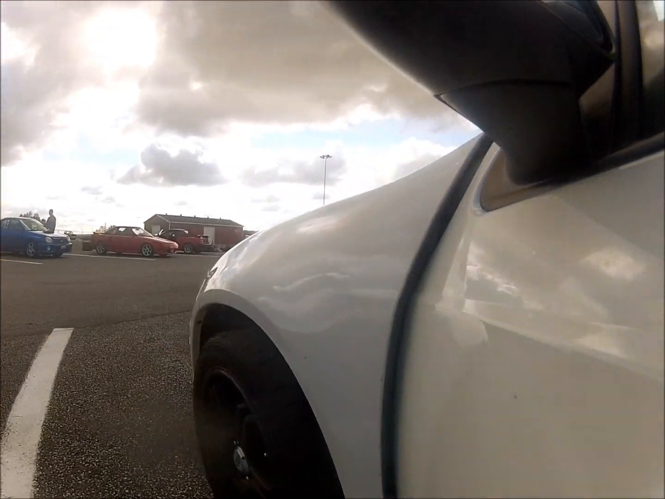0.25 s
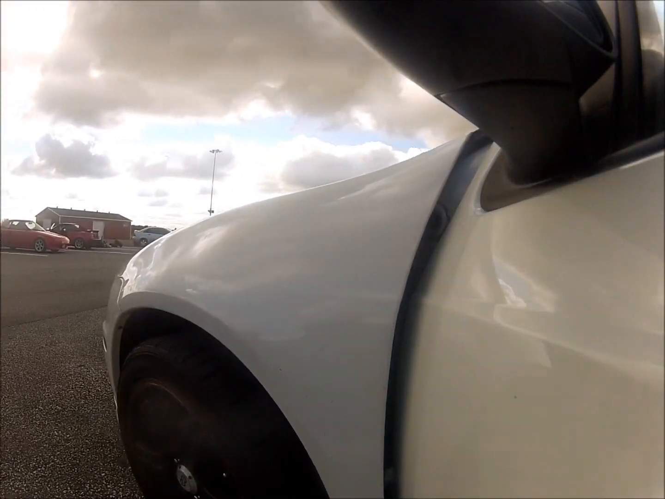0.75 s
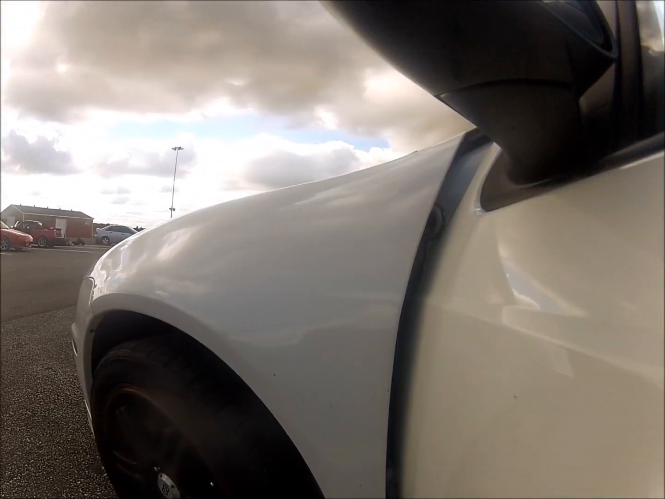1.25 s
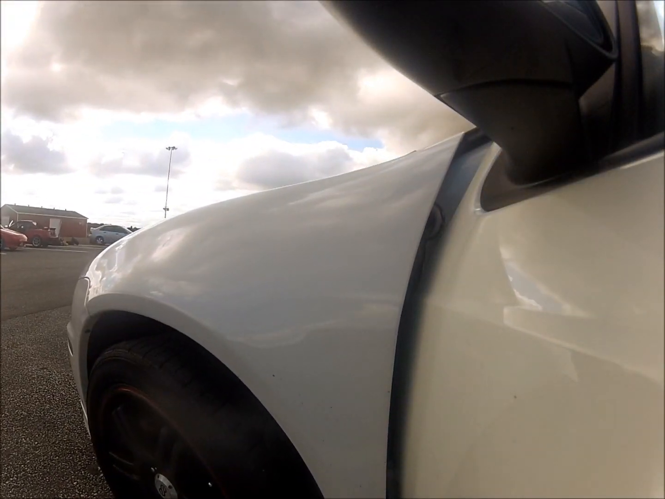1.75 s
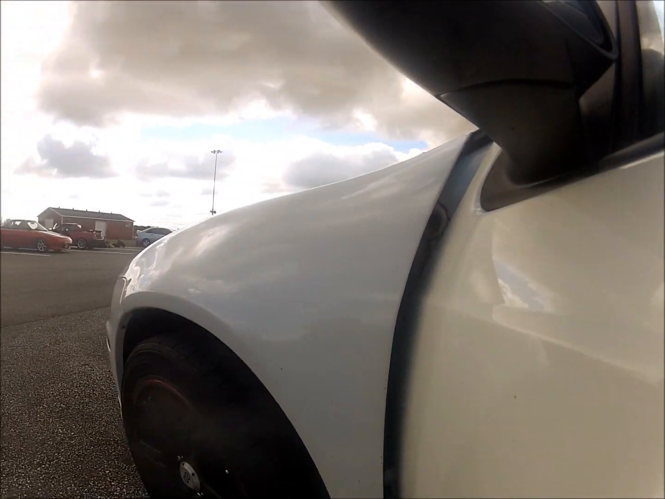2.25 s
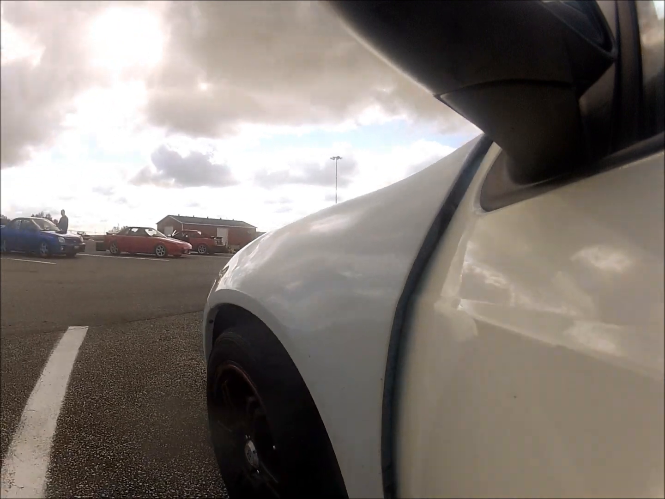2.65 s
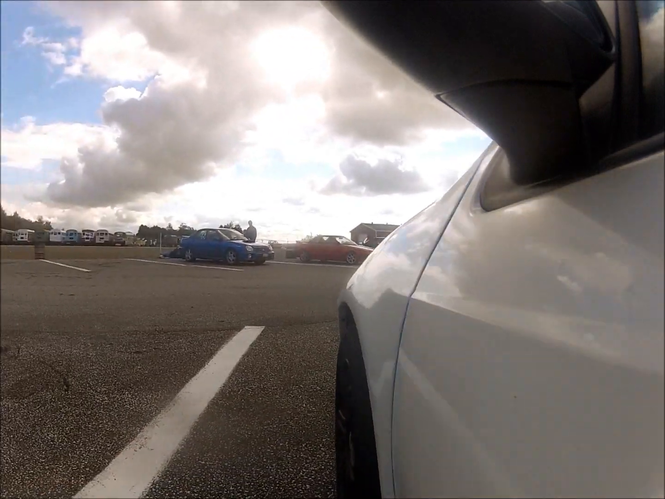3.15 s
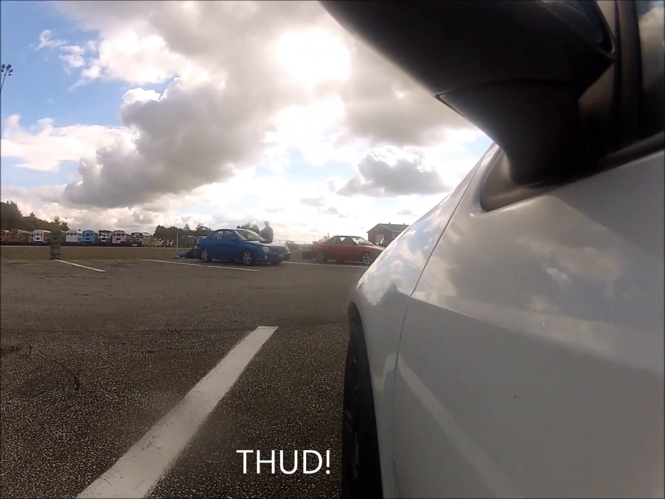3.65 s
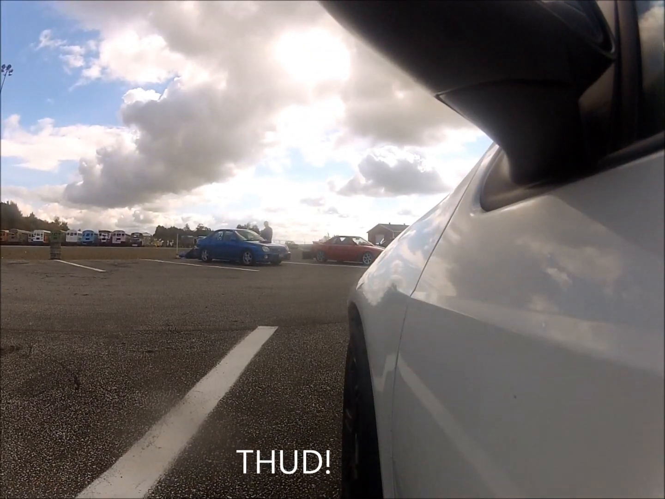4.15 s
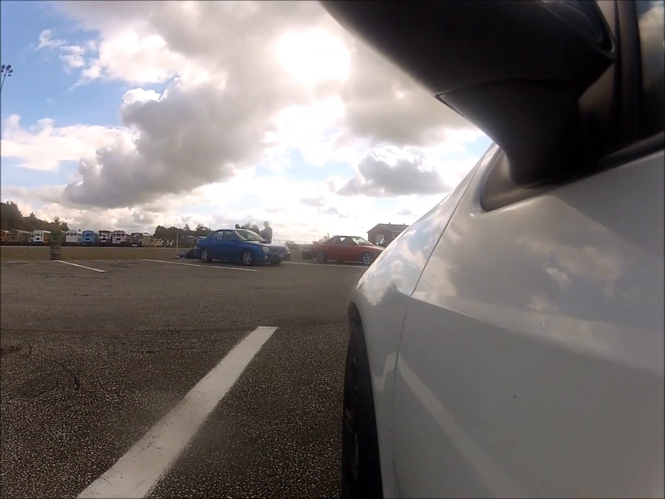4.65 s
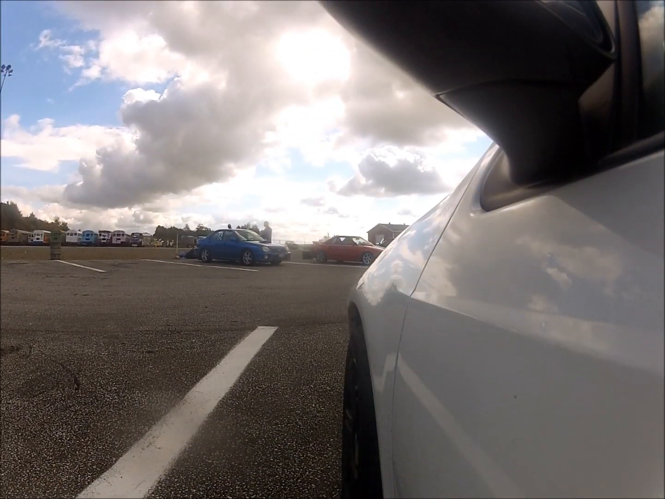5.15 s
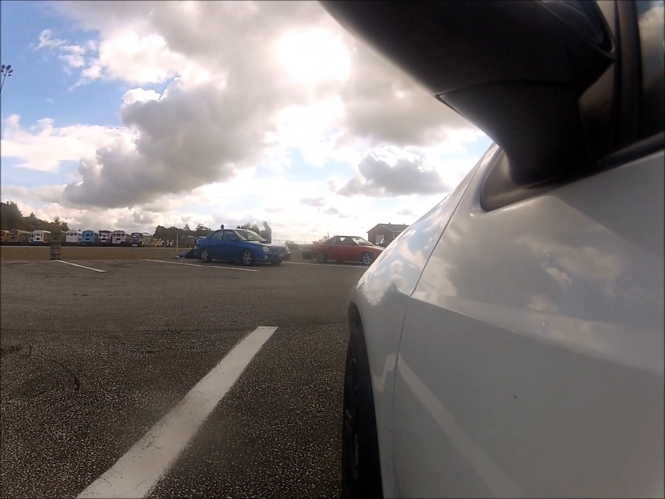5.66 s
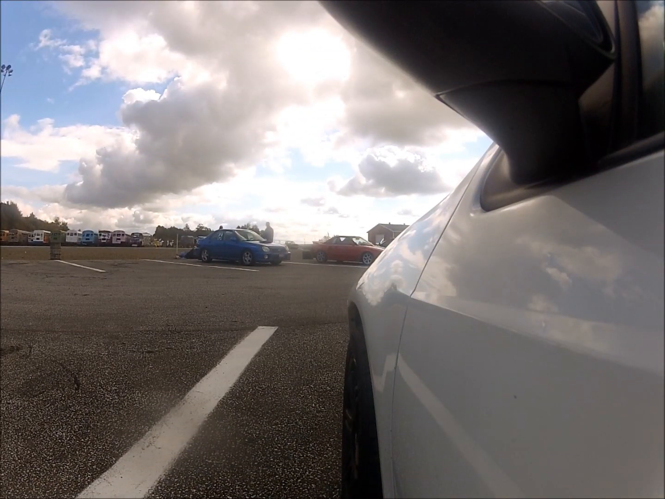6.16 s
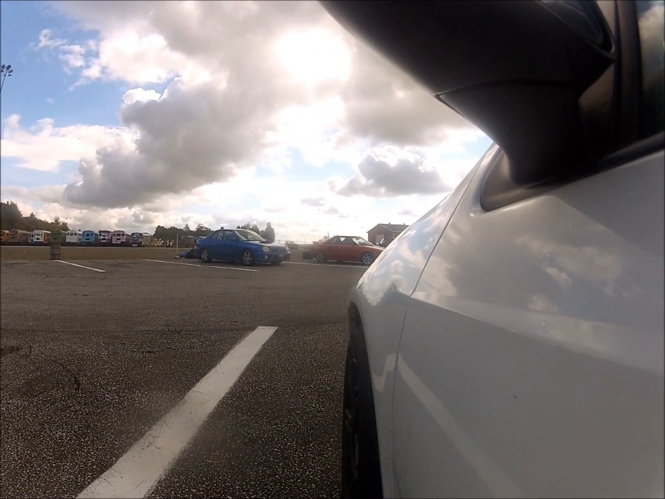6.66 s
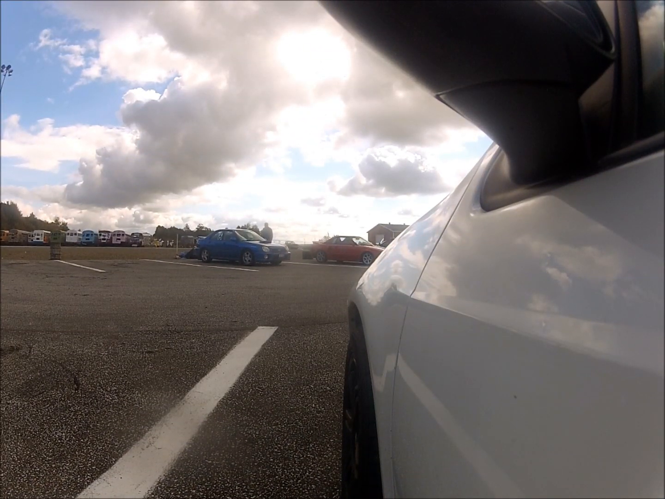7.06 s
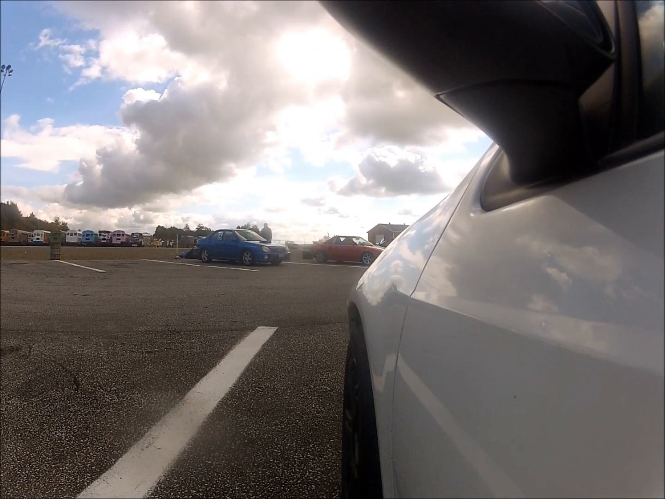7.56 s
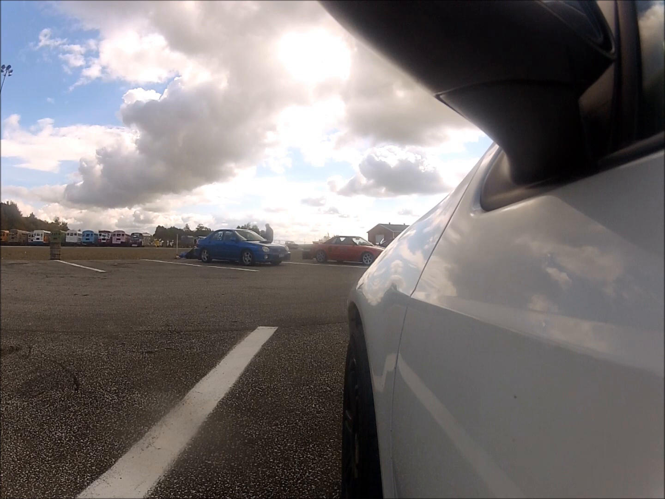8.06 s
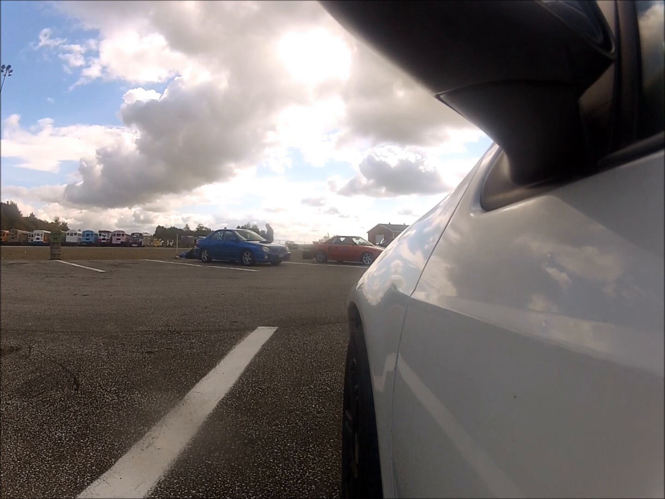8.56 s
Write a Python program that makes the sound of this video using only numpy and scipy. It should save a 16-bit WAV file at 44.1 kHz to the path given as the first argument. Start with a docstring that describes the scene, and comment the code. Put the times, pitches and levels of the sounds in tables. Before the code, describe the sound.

Quiet outdoor hiss, heard close against car bodywork. Four firm metallic knocks come as the door opens, then soft cloth rustles and a few dull bumps. A second cluster of knocks leads into one heavy, boomy slam with a short bright buzz. Inside, small hard taps and soft thuds carry through the metal. A very faint steady whine joins, and finally a gritty starter grinds and groans, without the engine catching.

```python
"""Car door, slam and starter

A camera stuck to the outside of a car door in an open paddock hears mostly through the metal, over a soft hiss.
The door knocks over its check strap as it opens and swings back, then slams and buzzes: rung metal and noise.
The driver taps, bumps and rustles inside, and each blow leaves the car body rumbling and the camera rocking.
A pump whines as a wavering tone; then the starter bites and cranks: gear noise, whining tones and a motor groan."""
import sys
import numpy as np
from scipy import signal
from scipy.fft import rfft, irfft, next_fast_len
from scipy.io import wavfile
from scipy.ndimage import uniform_filter1d

SR = 44100
rng = np.random.default_rng(int(sys.argv[2]) if len(sys.argv) > 2 else 0)


def log_audio(samples):
    """Write samples as a 16-bit WAV file to the path given in sys.argv[1]."""
    # one column per channel
    frames = np.atleast_2d(samples).T
    # limit to full scale, then quantise
    limited = np.clip(frames, -1, 1)
    pcm = np.round(limited * 32767).astype(np.int16)
    wavfile.write(sys.argv[1], SR, pcm)


N = 388521
T = np.arange(N) / SR  # time of every sample [s]

# The four tables of blows share these columns:
# (time [s], strength [dB], boom against strength [dB], ring against strength [dB])
# the door knocks over the notches of its strap, and settles in its latch
STRAP_KNOCKS = [(0.217, -41, -4, -11.5), (0.262, -37, -13, -14), (0.484, -42, -6.5, -14),
                (0.552, -39.5, -8, -19.5), (2.373, -38, -5, -14), (2.423, -32, -9, -18),
                (2.62, -35.5, -4.5, -7.5), (2.651, -30.5, -15, -18), (2.667, -35, -12, -15.5),
                (2.722, -51.5, -12, -10), (3.403, -35.5, 6, -16.5), (3.452, -46, 0, -13)]
# soft blows of limbs, seat and pedals
SOFT_BUMPS = [(1.48, -57, 14.5, -31), (1.642, -53.5, -8, -10.5), (2.15, -51.5, -5, -21),
              (2.298, -65, 23.5, -10), (3.68, -45, -1.5, -22.5), (3.75, -42.5, -6, -30),
              (3.79, -46.5, -3, -19), (5.568, -44.5, -17, -22), (6.307, -50.5, 1, -23),
              (6.387, -34.5, -1.5, -19.5), (6.718, -44, 4.5, -17.5), (6.996, -47, 6.5, -31),
              (7.145, -40.5, -2, -18), (7.172, -39, -0.5, -45), (7.29, -36.5, 3.5, -29),
              (7.342, -52, 19, -25), (7.646, -39.5, 2.5, -17), (7.739, -29, -2, -19.5)]
# the door meets seal, latch and frame
DOOR_SLAM = [(3.123, -42, 2.5, -26), (3.158, -47.5, 5, -2), (3.202, -23, -4, 5), (3.24, -11.5, -7, -18.5)]
# hard things handled in the cabin
HARD_TAPS = [(4.46, -64, 4, -1), (4.511, -61.5, 2, -5), (4.607, -53, 5.5, -3), (4.696, -54, 4, -6),
             (4.862, -49, 0.5, -7), (5.013, -65.5, 2, -1.5), (5.055, -53, 0, -7), (5.084, -51, 6.5, -25),
             (5.258, -54, 3, -10), (5.32, -43.5, -6, -3.5), (5.402, -44, -1.5, -11.5), (5.46, -59, -10, -8),
             (5.873, -49, -5.5, -7.5), (6.686, -53, -14, -9.5), (6.868, -50.5, -6, -17),
             (7.983, -67, 1, 2.5), (8.168, -62, 1, -6)]
# the car heaves under the driver's weight, the rebounding door and the first compressions:
# (time of the top [s], half-length [s], rocking [dB], rumble [dB])
CAR_HEAVES = [(1.767, 0.13, -46.5, -45.5), (3.051, 0.1, -45, -43), (3.443, 0.12, -22, -46.5),
              (4.75, 0.097, -50, -55), (6.437, .06, -44, -54), (6.797, 0.23, -55, -51),
              (7.18, .12, -54, -49.5), (7.84, .045, -39.5, -46), (8.52, 0.058, -20, -47),
              (8.751, 0.055, -34, -45.5)]
SHAKE_RISE_S, SHAKE_T60_S = 0.03, 1.1  # the body takes up a blow and lets it die away by 60 dB


def amp(db):
    """Turn decibels into a gain."""
    return 10 ** (np.asarray(db) / 20)


def unit(x):
    """Scale a sound to an average (rms) level of 1."""
    return x / np.sqrt(np.mean(x ** 2) + 1e-20)


def curves(rows):
    """Draw each column of a time table as a line through its points, sample by sample."""
    times, *columns = np.transpose(rows)
    return [np.interp(T, times, column) for column in columns]


def band(x, lo_hz, hi_hz, order=3):
    """Let through only the pitches between two limits."""
    limits = [lo_hz, min(hi_hz, SR / 2 - 1)]
    return signal.sosfilt(signal.butter(order, limits, "band", fs=SR, output="sos"), x)


def gain_at(hz, points):
    """Read a (frequency [Hz], level [dB]) table as a gain at any pitch."""
    at, db = np.transpose(points)
    return amp(np.interp(np.log(hz), np.log(at), db))


def colour(x, points):
    """Shape a sound's mix of pitches by a table, then scale it to rms 1."""
    n = next_fast_len(len(x))
    hz = np.arange(n // 2 + 1) * SR / n + 1
    return unit(irfft(rfft(x, n) * gain_at(hz, points), n)[:len(x)])


def noise(points, n=N):
    """Make noise with the given mix of pitches, at rms 1."""
    return colour(rng.standard_normal(n), points)


def walk(rate):
    """Wander slowly at random, with a spread near 1; rate is in steps per second."""
    k = int(SR / rate)
    steps = np.repeat(rng.standard_normal(N // k + 1), k)[:N]
    return unit(uniform_filter1d(steps, k))


def fade(t, t60):
    """Die away smoothly, falling 60 dB in t60 seconds."""
    return np.exp(-np.log(1000) * t / t60)


def gate(start, end, edge):
    """Open from start to end with straight ramps of edge seconds."""
    return np.clip(np.minimum(T - start, end - T) / edge, 0, 1)


def add(out, s, x):
    """Mix x into out at time s."""
    i = int(s * SR)
    out[i:i + len(x)] += x[:len(out) - i]


def air(flicker_db=.9, sing_hz=2320, sing_width_hz=170, sing_db=-83, sing_end=4.5):
    """Smooth hiss of the open paddock, with a faint narrow band of noise in it until sing_end."""
    # mix of pitches in the hiss: (frequency [Hz], level [dB])
    hiss_colour = [(150, -10), (300, -3.5), (480, -10.5), (850, -11.5), (2200, -16), (4000, -20),
                   (5100, -20), (7000, -23), (10000, -31), (15000, -39.5)]
    # slow course of the hiss: (time [s], level [dB])
    hiss_level = [(0, -76), (1.3, -74), (3, -70.5), (6, -67.5)]
    hiss = amp(curves(hiss_level)[0] + flicker_db * walk(10)) * noise(hiss_colour)
    lo, hi = sing_hz - sing_width_hz / 2, sing_hz + sing_width_hz / 2
    sing = unit(band(rng.standard_normal(N), lo, hi, order=1))
    return hiss + amp(sing_db) * (T < sing_end) * sing


def shake(rows, db, t60):
    """Power that the boom of each blow leaves in the car body: a quick rise and a slow fade."""
    out, t = np.zeros(N), np.arange(2 * SR) / SR
    shape = (1 - np.exp(-t / SHAKE_RISE_S)) * fade(t, t60)
    for s, strength, boom, _ in rows:
        add(out, s, (amp(strength + boom + db) * shape) ** 2)
    return out


def heave(s, width):
    """Power of one smooth swell, 1 at its top."""
    return np.exp(-2 * ((T - s) / width) ** 2)


def fidget(empty_db, seated_db, seated=4.28, settle=.3):
    """Power of the restless background, higher once the driver sits inside (times in s)."""
    return amp(np.interp(T, [seated, seated + settle], [empty_db, seated_db])) ** 2


def body(panel_db=-9, panel_empty_db=-70, panel_seated_db=-63):
    """The car body rumbles low after each blow and through each heave; its panels follow more quietly."""
    # mix of pitches in the rumble: (frequency [Hz], level [dB])
    stir_colour = [(45, -15), (85, 3.5), (110, -4), (150, -7.5), (220, 3), (280, -11.5), (450, -16.5),
                   (700, -26)]
    power = shake(STRAP_KNOCKS, db=-12.5, t60=SHAKE_T60_S) + shake(DOOR_SLAM, db=-6.5, t60=1.2)
    power += shake(HARD_TAPS, db=-7, t60=SHAKE_T60_S) + shake(SOFT_BUMPS, db=-13.5, t60=SHAKE_T60_S)
    power += sum(amp(db) ** 2 * heave(s, width) for s, width, _, db in CAR_HEAVES)
    boom = np.sqrt(power + fidget(empty_db=-67, seated_db=-62.0))
    panel = np.sqrt(power * amp(panel_db) ** 2 + fidget(panel_empty_db, panel_seated_db))
    stir = noise(stir_colour)
    return boom * unit(band(stir, 40, 150)) + panel * unit(band(stir, 150, 610))


def rocking(sway_hz=32.5, waver=0.027):
    """Blows and heaves rock the camera on its mount: a low tone near the mount's own pitch."""
    power = shake(STRAP_KNOCKS, db=-1.5, t60=SHAKE_T60_S) + shake(DOOR_SLAM, db=4.5, t60=.8)
    power += shake(HARD_TAPS, db=-5.5, t60=SHAKE_T60_S) + shake(SOFT_BUMPS, db=-11.5, t60=SHAKE_T60_S)
    power += fidget(empty_db=-73.5, seated_db=-62.5)
    power += sum(amp(db) ** 2 * heave(s, width) for s, width, db, _ in CAR_HEAVES)
    pitch = sway_hz * (1 + waver * walk(5.2))
    return np.sqrt(2 * power) * np.sin(2 * np.pi * np.cumsum(pitch) / SR)


def blows(rows, tint, contact, tick_db, low_ring, high_ring, dense_db, touch=0.0098, touch_db=-17):
    """Each blow rings single tones and a dense wash of panel resonances; a longer contact swells slower.

    contact and touch are in s; low_ring and high_ring multiply how long the ringing lasts."""
    # tones of the door skin, the mount and the camera case, before each blow varies them:
    # (frequency [Hz], fade time t60 before the ring factor [s], level before the blow's colour [dB])
    modes = [(78.55, 0.6, -0.5), (99, 0.19, 1), (109, 0.28, 0), (176, .2, -4), (219.64, 0.27, 2.5),
             (229.4, 0.19, -1), (313.5, .15, -2.5), (392.6, 0.14, -4.5), (433.5, .2, -3.5), (950, 0.12, -5),
             (1032, 0.2, -3.5), (1145, 0.17, 1), (1205, .2, 0), (1400, 0.12, -4.5), (1625, .17, -1),
             (1824, 0.1, -4.5), (2032, .14, -4), (2156, 0.083, -1), (2324, 0.21, -3), (2950, .08, -2),
             (3600, 0.09, -2), (3650, 0.11, -3)]
    # the four registers of a blow, boom to tick: (low edge [Hz], high edge [Hz],
    # t60 of the dense wash before the ring factor [s], wash against tones before dense_db [dB])
    registers = [(55.3, 150, 0.31, -8.5), (153, 720, 0.19, -6.5), (781.6, 2500, 0.17, -1),
                 (2500, 5800, 0.091, 8.5)]
    out, t = np.zeros(N), np.arange(SR // 2) / SR
    hz, life, mode_db = np.transpose(modes)
    swell = 1 - np.exp(-(t / contact) ** 2)
    rings = (low_ring, low_ring, high_ring, high_ring)
    for s, strength, boom, bright in rows:
        # the tick, highest of the four, follows the level of the ring
        levels = strength + np.array([boom, 0, bright, bright + tick_db])
        wash = noise(tint, len(t))
        detune, spot, phase = rng.standard_normal((len(hz), 3)).T
        size = amp(mode_db + 1.5 * spot) * gain_at(hz, tint)
        pitch = hz * (1 + 0.0066 * detune)
        for (lo, hi, t60, wash_db), db, ring in zip(registers, levels, rings):
            inside = np.flatnonzero((hz > lo) & (hz < hi))
            tones = sum(size[k] * np.sin(2 * np.pi * (pitch[k] * t + phase[k])) * fade(t, life[k] * ring)
                        for k in inside)
            dense = unit(band(wash, lo, hi))
            dense_ring = unit(dense * fade(t, t60 * ring))
            x = swell * (unit(tones) + amp(wash_db + dense_db) * dense_ring)
            # the level is set by the first 40 ms
            add(out, s, amp(db) * x / np.std(x[t < .04]))
            # the parts graze each other just before they meet
            graze = swell * dense[::-1] * fade(t, t60 / 2)
            add(out, s - touch, amp(db + touch_db) * graze)
    return out


def strap_knocks():
    """Short, firm contacts ring the door as it passes the strap's notches and settles in its latch."""
    # colour of a blow on the strap: (frequency [Hz], level [dB])
    strap_colour = [(60, -0.5), (230, 1), (300, -5), (430, -10.5), (780, -26), (950, -12), (1200, -16),
                    (1550, -21), (2100, -20), (2600, -36), (3700, -43), (5200, -55)]
    return blows(STRAP_KNOCKS, strap_colour, contact=0.0011, tick_db=-19, low_ring=.9, high_ring=0.97,
                 dense_db=0.0, touch_db=-21.5)


def clicks(t60=0.012, tail_t60=0.055, tail_db=-17, db=-1):
    """Loose trim and latch parts click: short bright noise with a faint ring behind it."""
    # when the parts click: (time [s], peak level before the overall db [dB])
    click_rows = [(0.2782, -45.5), (2.4387, -43.5), (2.8646, -47), (3.2343, -12), (3.2387, -13.5),
                  (3.2477, -14), (3.2547, -11), (3.2773, -16), (3.284, -14), (3.294, -21.5), (3.298, -25.5),
                  (3.314, -17), (3.3244, -18.5), (3.3275, -15), (3.3413, -10), (3.3655, -18), (3.3804, -37),
                  (3.404, -44)]
    # mix of pitches in a click: (frequency [Hz], level [dB])
    click_colour = [(900, -18), (1800, -3), (3000, -1.5), (3700, 2.5), (4800, -2), (6000, -2), (8500, -5),
                    (11000, -18), (15000, -15.5)]
    out, t = np.zeros(N), np.arange(SR // 10) / SR
    shape = fade(t, t60) + amp(tail_db) * fade(t, tail_t60)
    for s, peak_db in click_rows:
        x = noise(click_colour, len(t)) * shape
        add(out, s, amp(peak_db + db) * x / np.abs(x).max())
    return out


def rustles(grain_db=2.5, edge=0.018):
    """Clothes and belt slide: noise whose level flickers like grains rubbing past."""
    # each slide: (start [s], end [s], level [dB])
    slides = [(0.731, 0.86, -71.5), (1.47, 1.61, -73), (1.577, 1.943, -68), (1.816, 1.886, -71),
              (6.844, 6.968, -64), (7.545, 7.64, -61.5), (7.601, 7.717, -52)]
    # mix of pitches in the sliding: (frequency [Hz], level [dB])
    rustle_colour = [(300, 7), (750, -4.5), (1200, 5.5), (1600, -7), (2300, 1), (2800, -15), (3800, -7),
                     (5000, -16.5), (9000, -18.5), (15000, -34)]
    level = sum(amp(db) * gate(start, end, edge) for start, end, db in slides)
    return level * amp(grain_db * walk(120)) * noise(rustle_colour)


def bumps():
    """Limbs, seat and pedals give softer, slower contacts, so the ring is duller."""
    # colour of a soft blow: (frequency [Hz], level [dB])
    bump_colour = [(60, -6), (105, 6.5), (160, -8), (220, -4), (310, -14.5), (420, -17), (700, -39),
                   (1130, -24.5), (1500, -36), (2200, -34), (3000, -45.5), (5200, -46)]
    return blows(SOFT_BUMPS, bump_colour, contact=0.0037, tick_db=-17, low_ring=1.19, high_ring=0.82,
                 dense_db=-0.5, touch_db=-5)


def slam():
    """The door meets seal, latch and frame: slow, heavy contacts with a shortened ring."""
    # colour of the slam: (frequency [Hz], level [dB])
    slam_colour = [(60, -0.5), (160, -1), (217, 2.5), (270, -14), (400, -9), (500, -15), (640, -18),
                   (780, -32), (1050, -18), (1250, -16), (1500, -21), (2200, -13.5), (2800, -26),
                   (3800, -26), (5200, -31.5)]
    return blows(DOOR_SLAM, slam_colour, contact=.012, tick_db=-11.5, low_ring=0.62, high_ring=0.49,
                 dense_db=0.0, touch_db=-25.5)


def slam_buzz(start=3.225, stop=3.345, t60=1.0, stop_t60=.17, db=-35, patchy_db=6.5):
    """The slam sets glass and trim buzzing: patchy noise that fades slowly, then faster after stop."""
    t = np.maximum(T - start, 0)
    buzz = noise([(700, -10), (1200, 1.5), (2300, 1.5), (3000, -8), (4500, -13), (6000, -19),
                  (9000, -20), (15000, -29)])
    shape = (1 - np.exp(-t / .004)) * fade(t, t60) * fade(np.maximum(T - stop, 0), stop_t60)
    return amp(db + patchy_db * walk(270)) * buzz * shape


def taps():
    """Hard things handled in the cabin make short contacts, heard through the door."""
    # colour of a hard tap: (frequency [Hz], level [dB])
    tap_colour = [(60, 4), (220, -1), (300, -2), (420, -4.5), (620, -13.5), (800, -36), (1000, -15.5),
                  (1200, -9), (1500, -20), (1900, -22.5), (2170, -10), (2600, -34), (3100, -25),
                  (3600, -30), (5200, -42)]
    return blows(HARD_TAPS, tap_colour, contact=.0014, tick_db=-15, low_ring=0.78, high_ring=0.76,
                 dense_db=-4.0, touch_db=-9.0)


def pump(start=5.2, hz=1010, db=-79):
    """The fuel pump whines faintly from start onward: one tone with a slightly wavering pitch."""
    pitch = hz * (1 + 0.00423 * walk(2.3))
    return amp(db) * np.clip((T - start) / 0.092, 0, 1) * np.sin(2 * np.pi * np.cumsum(pitch) / SR)


def squeak(start=8.322, end=8.378, hz=1205, db=-63, edge=0.013):
    """Something gives a tiny squeak just before the starter bites: a brief pure tone."""
    return amp(db) * gate(start, end, edge) * np.sin(2 * np.pi * hz * T)


def starter(grain_db=3, band_db=-1, grind_db=-5.5, groan_db=-2, jitter=0.00572, flicker_db=4,
            squeeze=8.74, note_db=-1):
    """Gears grind in noise and whining tones while the motor groans against the first compressions."""
    # course of the cranking, before the trims above: (time [s], gear noise [dB], groan [dB])
    crank = [(8.39, -72, -64), (8.404, -80, -40), (8.432, -35.5, -34.5), (8.474, -44, -30),
             (8.508, -54.5, -39), (8.588, -49, -45.5), (8.65, -58.5, -45.5), (8.796, -45.5, -41),
             (8.81, -51, -50)]
    # narrow bands of gear noise; the four highest are mirrored recorder tones:
    # (frequency [Hz], width [Hz], level before band_db [dB])
    gear_bands = [(1215, 17.6, -0.5), (2327, 95, 0), (2940, 60, -13), (3443, 25, -2.5), (4900, 37, -14.5),
                  (7050, 50, -19), (8400, 39, -13), (9800, 120, -18), (10800, 30, -27)]
    # mix of pitches in the grinding: (frequency [Hz], level [dB])
    gear_colour = [(400, 0.5), (800, 4.5), (1100, 11), (1700, 3), (2400, -8), (4000, 1), (5200, -1.5),
                   (8500, -5), (11000, -25), (15000, -24)]
    # the starter spins up and is dragged down by compression: (time [s], mesh rate before jitter [Hz])
    spin = [(8.42, 223), (8.49, 265), (8.55, 293), (8.61, 326.6), (8.68, 347.4), (8.75, 330), (8.81, 285)]
    # whining tones that follow the mesh rate; the two highest are mirrored recorder tones:
    # (multiple of the mesh rate, level before flicker [dB])
    whine_tones = [(11, -20), (13, -17), (17, -16), (24, -21), (27, -22)]
    gear, groan = curves(crank)
    teeth = rng.standard_normal(N) * amp(grain_db * walk(600))
    bands = sum(amp(db) * unit(band(teeth, hz - width / 2, hz + width / 2, order=1))
                for hz, width, db in gear_bands)
    turn = 2 * np.pi * np.cumsum(curves(spin)[0] * (1 + jitter * walk(150))) / SR
    whine = sum(amp(db + flicker_db * walk(30)) * np.sin(k * turn) for k, db in whine_tones)
    gear_sound = amp(band_db) * unit(bands) + amp(grind_db) * colour(teeth, gear_colour) + whine
    motor = noise([(40, -19.5), (80, 5.5), (150, -11.5), (210, 6.5), (260, -12), (310, -9.5),
                   (370, -34.0), (470, -16.0), (600, -39), (1500, -59)])
    # the mesh note itself sings out once a piston comes up on compression
    note = amp(note_db) * np.clip((T - squeeze) / 0.018, 0, 1) * np.sin(turn)
    bite = np.clip((T - 8.412) / 0.0093, 0, 1)
    return bite * (amp(gear) * gear_sound + amp(groan) * (amp(groan_db) * motor + note))


def pinion(start=8.424, end=8.458, db=-38, edge=0.0088):
    """The starter's small gear, the pinion, scrapes into the ring gear: a short burst of bright noise."""
    scrape = noise([(400, -19.0), (1150, 4.5), (1700, -2), (2300, -1), (3600, 12.0), (5000, -6.5),
                    (8500, -1), (11000, -23), (15000, -27)])
    return amp(db) * gate(start, end, edge) * scrape


def scene():
    """Add up all the sounds; the same mix goes to both channels, as from one microphone."""
    door = strap_knocks() + clicks() + slam() + slam_buzz()
    cabin = rustles() + bumps() + taps() + squeak()
    engine = pump() + starter() + pinion()
    mono = air() + body() + rocking() + door + cabin + engine
    return np.array([mono, mono])


def record(dry, flutter=1.3, mirror_hz=12000, notch_hz=6000, notch_q=3.9, ceiling=.63, top_hz=15500):
    """The camera's fluttering sample timing mirrors sound faintly around mirror_hz; then notch, clip, top cut."""
    # a timing error changes the sound in proportion to its slope
    low = signal.sosfilt(signal.butter(2, 5000, fs=SR, output="sos"), dry)
    slope = np.gradient(low, axis=1)
    clock = np.sin(2 * np.pi * mirror_hz * T)
    fluttered = dry + flutter * slope * clock
    notched = signal.lfilter(*signal.iirnotch(notch_hz, notch_q, fs=SR), fluttered)
    clipped = np.clip(notched, -ceiling, ceiling)
    return signal.sosfilt(signal.ellip(8, .2, 70, top_hz, fs=SR, output="sos"), clipped)


dry = scene()
out = record(dry)
log_audio(out)
```